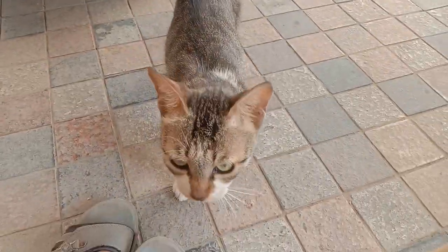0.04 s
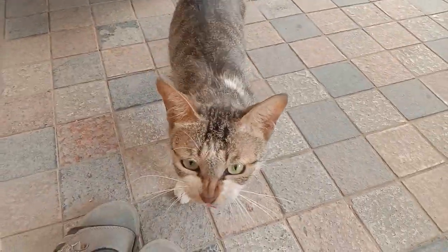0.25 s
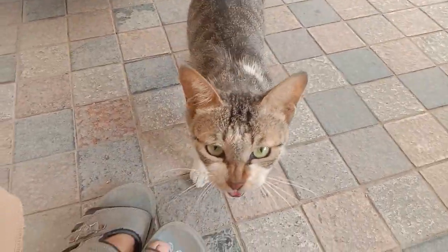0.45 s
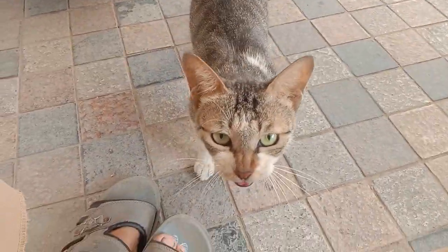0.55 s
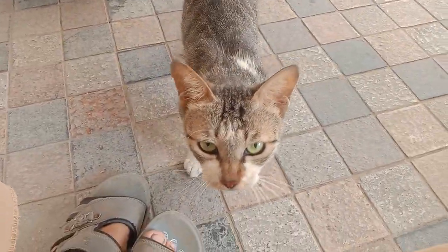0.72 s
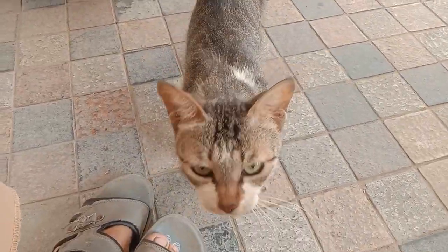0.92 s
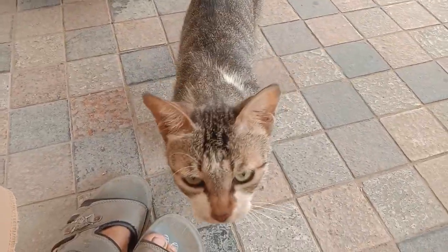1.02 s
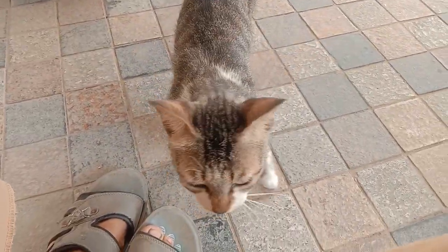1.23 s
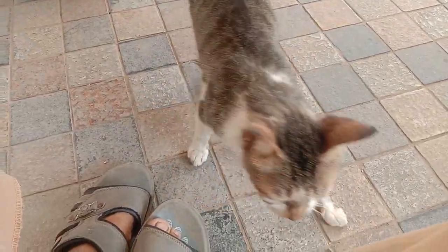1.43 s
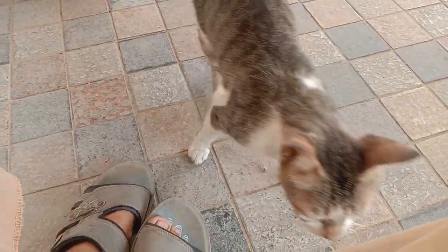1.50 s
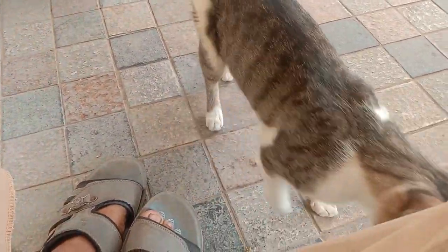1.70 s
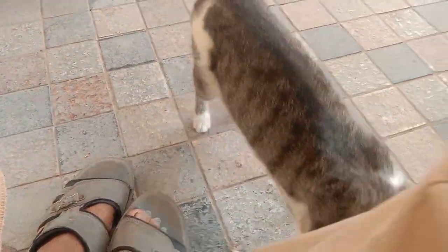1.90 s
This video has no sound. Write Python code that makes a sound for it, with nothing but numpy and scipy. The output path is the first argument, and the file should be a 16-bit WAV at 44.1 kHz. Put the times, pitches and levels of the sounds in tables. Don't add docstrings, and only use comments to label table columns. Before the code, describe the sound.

A cat close to the microphone meows once from about 0.15 to 0.8 s: hoarse and doubled, rising to a clear steady tone, then sinking shut with a short wall echo. A sole scuffs at 0.77-0.95 s. Grit ticks near 1.3-1.4 s as a small hollow object drags, then knocks and rattles at 1.58 s, ringing away. Soft foot thuds, faint traffic hum and leaf hiss lie beneath.

```python
import sys
import numpy as np
from scipy import signal
from scipy.fft import rfft, irfft
from scipy.io import wavfile
from scipy.ndimage import uniform_filter1d

SR = 44100
rng = np.random.default_rng(int(sys.argv[2]) if len(sys.argv) > 2 else 0)


def digitize_waveform(pressure):
    field = np.atleast_2d(pressure).T
    bounded = np.clip(field, -1, 1)
    quanta = np.round(bounded * 32767).astype(np.int16)
    wavfile.write(sys.argv[1], SR, quanta)


def level_to_linear(level):
    exponent = np.asarray(level, float) / 20
    return 10 ** exponent


N = 85995
T = np.arange(N) / SR


def level(x, db):
    return x * level_to_linear(db) / np.sqrt(np.mean(x ** 2))


def colour(x, points, tilt_db=0.):
    p = np.array(points, float)
    size = N + 4117
    hz = np.arange(size // 2 + 1) * SR / size + 1
    db = np.interp(np.log(hz), np.log(p[:, 0]), p[:, 1])
    db = db + tilt_db * np.log2(np.maximum(hz / 5500, 1))
    return irfft(rfft(x, size) * level_to_linear(db), size)[..., :N]


def band(x, hz, width):
    return signal.lfilter(*signal.iirpeak(min(hz, .45 * SR), hz / width, SR), x)


def band_twice(x, hz, width):
    return band(band(x, hz, width), hz, width)


def walk(rate, size=N):
    k = int(SR / rate)
    held = np.repeat(rng.standard_normal(size // k + 1), k)
    return 1.48 * uniform_filter1d(uniform_filter1d(held, k), k)[:size]


def shape(start, attack, hold, fall):
    rise = np.clip((T - start) / attack, 0, 1) ** 2
    return rise * level_to_linear(-20 * np.clip((T - start - attack - hold) / fall, 0, 9))


def decay(start, t60):
    return (T >= start) * level_to_linear(-60 * np.clip((T - start) / t60, 0, 9))


def cat():
    # (time [s], pitch [Hz], level [dB])
    meow = [
        (0.148, 329.6, -59),
        (.2, 361.1, -41),
        (0.252, 415.2, -35.5),
        (0.335, 453.1, -31.5),
        (0.507, 462.5, -25),
        (0.69, 452.8, -28),
        (0.738, 439.5, -31),
        (.78, 403, -29),
        (0.803, 408, -40),
    ]
    # (time [s], resonance [Hz], its level [dB], half-pitch lines [dB], brightness [dB], chest [dB])
    mouth_track = [
        (.18, 2240, -7, -7, -3.5, 0),
        (0.226, 2314, 3, -4, 3.5, 3.5),
        (.285, 2370, 12, -1.5, 8, 1),
        (0.339, 2270, -11, -16, 8, -0.5),
        (0.369, 2004, 10, -23, 6, -2.5),
        (0.484, 1918, 14, -58, 1.5, -6.5),
        (0.571, 1600, -7, -37.5, 0.5, -20.5),
        (0.701, 1450, -6, -49, 6, 2.5),
        (0.791, 1500, -40.5, -20, 1, 7),
    ]
    # (multiple of the held pitch, level [dB])
    throat = [(1, -10.5), (2, 2.5), (3, -2), (4, 0.5), (5, -32), (6, -31), (7, -15.5), (8, -9), (9, -28),
              (10, -28), (11, -27), (12, -27), (13, -37), (14, -44), (15, -24.5), (16, -33.5)]
    # (time [s], roughness at 3.47 kHz [0-1])
    hoarse = [
        (.17, .7),
        (.215, .5),
        (.29, .4),
        (.345, .8),
        (.37, .25),
        (.45, .12),
        (.5, .05),
        (.75, .06),
        (.8, .4),
    ]
    # (time [s], added roughness [0-1])
    catches = [(.345, .3), (.395, .15), (.44, .22), (.525, .12), (.573, .13), (.613, .17), (.667, .16),
               (.706, .2)]
    # (time [s], upper throat resonance [Hz], its level [dB], nose resonance [Hz], its level [dB])
    rasp_track = [
        (.172, 3480, -33, 5810, -31),
        (.19, 3520, 5.5, 6050, -13.5),
        (.235, 3900, -5.5, 6100, -27.5),
        (.29, 4200, -19.5, 6500, -27.5),
        (.35, 4150, -6, 7000, -34.5),
        (.44, 4100, -15, 7150, -18),
        (.55, 4100, -20.5, 6330, -33.5),
        (.63, 4100, -17.5, 6170, -27),
        (.72, 4000, -16.5, 5960, -25.5),
    ]
    held_hz, bright_hz, rough_above_hz, rough_hz = 462, 2870, 3470, 380
    mouth_width_hz, rasp_width_hz, nose_width_hz = 83.5, 260, 187
    start_s, stop_s, fade_s = 0.15, .805, 0.0097
    span = slice(6600, 36600)
    t = T[span]

    def soft(track):
        return uniform_filter1d(track, size=700)

    def drift(rate):
        return walk(rate, size=len(t))

    def tracks(table):
        columns = np.array(table).T
        return [soft(np.interp(t, columns[0], v)) for v in columns[1:]]

    def peak(f, centre, width):
        return 1 / np.sqrt(1 + ((f - centre) / width) ** 4)

    meow_s, meow_hz, meow_db = np.array(meow).T
    throat_multiple, throat_db = np.array(throat).T
    hz = soft(np.interp(t, meow_s, meow_hz))
    mouth_hz, mouth_db, half_db, bright_db, chest_db = tracks(mouth_track)
    rasp_hz, rasp_db, nose_hz, nose_db = tracks(rasp_track)
    mouth, halves, rasp, nose = level_to_linear(mouth_db), level_to_linear(half_db), level_to_linear(rasp_db), level_to_linear(nose_db)

    puffs = level_to_linear(-26 + 4 * np.clip(drift(70), -2, 2))
    rough = np.interp(t, *np.array(hoarse).T)
    rough = rough + sum(more * np.exp(-((t - s) / .007) ** 2) for s, more in catches)
    wobble = 0.0033 * drift(40.6) + 0.0033 * rough * drift(220)
    phase = 2 * np.pi * np.cumsum(hz * (1 + wobble)) / SR
    closing_db = -150 * np.clip(t - meow_s[6], 0, 1)
    top_db = -55 * np.clip(t - .46, 0, 1)

    out = np.zeros(N)
    for k in np.arange(1, 35.5, .5):
        f, half = k * hz, k % 1 > 0
        db = np.interp(f / held_hz, throat_multiple, throat_db)
        db = db + bright_db / (1 + (bright_hz / f) ** 6) - .7 * max(k - 17, 0)
        db = db + chest_db * (k == 1) + closing_db * (2 < k < 7 or k > 10) + top_db * (k > 18)
        gain = level_to_linear(db) + mouth * peak(f, mouth_hz, mouth_width_hz)
        if 6 < k < 20:
            gain = gain + rasp * peak(f, rasp_hz, rasp_width_hz) + nose * peak(f, nose_hz, nose_width_hz)
        line = halves if half else 1
        reach = np.clip(.24 * halves * 2 + (f / rough_above_hz) ** 1.9, 0, 9)
        smear = np.clip(rough * reach, 0, 1)
        noise = line * smear + puffs * (0.2 + f / rough_above_hz)
        turn = k * phase + np.pi / 2 * k ** 2 + 2 * np.pi * rng.random() * (half or k > 5)
        line = line * np.sqrt(1 - smear ** 2) * level_to_linear(.35 * np.clip(k - 4, 1, 11) * drift(12))
        in_phase = (line + noise * drift(rough_hz)) * np.sin(turn)
        out[span] += gain * (in_phase + noise * drift(rough_hz) * np.cos(turn))
    gate = np.clip(np.minimum(T - start_s, stop_s - T) / fade_s, 0, 1)
    return out * gate * level_to_linear(soft(np.interp(T, meow_s, meow_db)) - 2)


def knock():
    # (time [s], level [dB])
    blows = [(1.582, -4.5), (1.5854, 0.5), (1.592, 3.5), (1.605, 0.5), (1.622, -4.5), (1.639, -5),
             (1.65, -8.5), (1.665, -12.5), (1.674, -13.5), (1.699, -13.5), (1.719, -11)]
    # (frequency [Hz], level [dB], t60 [s])
    body = [(186, -13.5, 0.65), (404, -6, 0.4), (807, -7.5, 0.94), (1040, -16, .3), (600, -10.5, 0.13),
            (1274, 1, 0.82), (1500, -20, .5), (1856, -5.5, .7), (3016, -0.5, 0.39), (3270, -14, 0.2),
            (4460, -31, 0.35), (5000, -28, 0.17)]
    # (frequency [Hz], level [dB])
    clatter_colour = [(70, -19), (180, -3.5), (450, -9), (862, -9.5), (1250, 2), (1600, -23), (5460, -19.5),
                      (16000, -24)]
    crack_s, clatter_t60_s, tail_t60_s = 0.0011, 0.12, 0.94
    start = blows[1][0]
    crack = rng.standard_normal(N) * sum(level_to_linear(db) * decay(s, crack_s * 3) for s, db in blows)
    rings = 0
    for hz, db, t60 in body:
        ring_s = .2 * t60
        sustained = level(band(rng.standard_normal(N), hz, 9 / ring_s), 0) * 0.13 * decay(start, t60)
        struck = band(crack, hz, 4.9 / ring_s) * SR * ring_s / 300
        rings = rings + level_to_linear(db) * (sustained + struck)
    hiss = rng.standard_normal((2, N))
    contacts = sum(level_to_linear(db) * uniform_filter1d(decay(s, clatter_t60_s), size=60) for s, db in blows)
    clatter = level(colour(hiss[0], clatter_colour), -28.5) * contacts
    tail = level(colour(hiss[1], clatter_colour, tilt_db=-10.5), -34)
    tail = tail * decay(start, tail_t60_s) * level_to_linear(2.5 * walk(29.54))
    return level_to_linear(-20) * rings + clatter + tail


def drag():
    # (frequency [Hz], width [Hz], level [dB])
    modes = [(1036, 23, -12), (1497, 110, -5.5), (1617, 114, -3.5), (1878, 150, 0), (2430, 95, -42),
             (3400, 200, -53), (4294, 69, -11.5), (4930, 730, -20), (6720, 150, -21.5)]
    slips_per_s = 6000
    slips = (rng.random(N) < slips_per_s / SR) * rng.standard_normal(N) * level_to_linear(1.5 * walk(70))
    rung = sum(level_to_linear(db) * level(band_twice(slips, hz, 1.1 * w), 10 * np.log10(w)) for hz, w, db in modes)
    return level(rung, -41.5) * shape(1.372, attack=.02, hold=0.28, fall=0.29)


def scuff():
    # (frequency [Hz], level [dB])
    sole_colour = [(500, -21), (620, 7.5), (974, -12.5), (1260, 2), (2130, -5.5), (3800, 4.5), (5630, 0),
                   (9500, -14.5)]
    start_s, hold_s, grit_hz = 0.7684, 0.14, 14900
    sag = level_to_linear(-10.5 * np.clip((T - start_s) / hold_s, 0, 1) + 0.5 * walk(40))
    grit = level(band_twice(rng.standard_normal(N), grit_hz, 2500), -54.5)
    sole = level(colour(rng.standard_normal(N), sole_colour), -40) * sag
    return (sole + grit) * shape(start_s, 0.016, hold_s, fall=0.066)


def ticks():
    # (time [s], level [dB], length [s], centre [Hz])
    clicks = [(.345, -19, 0.0042, 3970), (.777, -46, .004, 6500), (1.322, -34, 0.00066, 11000),
              (1.35, -41, .0015, 5000), (1.351, -32, 0.0012, 11000), (1.38, -39, 0.0044, 3100),
              (1.385, -33, 0.0087, 3900), (1.386, -33, 0.011, 4930), (1.389, -34, 0.0082, 7400),
              (1.39, -35, 0.0093, 10100), (1.426, -40, .002, 9800), (1.437, -41, .002, 9500),
              (1.573, -24, .012, 1950)]
    hiss = rng.standard_normal(N)
    return sum(level_to_linear(db) * band_twice(hiss * decay(s, 4 * length), hz, .4 * hz) for s, db, length, hz in clicks)


def steps():
    # (time [s], level [dB], length [s])
    thuds = [
        (0.118, -50.5, 0.034),
        (0.89, -52, 0.05),
        (1.303, -47.5, 0.075),
        (1.369, -52.5, 0.065),
        (1.631, -42.5, 0.067),
    ]
    push = sum(level_to_linear(db) * shape(s, 0.012, length / 3, length) for s, db, length in thuds)
    return 12 * band_twice(rng.standard_normal(N) * push, 128, 128)


def hums():
    # (time [s], level [dB], length [s])
    swells = [(0.02, -52.5, 0.048), (0.061, -50, 0.087), (0.106, -51, 0.026), (0.628, -52.5, 0.098),
              (0.978, -52, .16), (1.484, -51, 0.14), (1.797, -47, 0.035)]
    hum_hz, width_hz = 325, 66
    push = sum(level_to_linear(db) * shape(s, 0.016, length / 2, length) for s, db, length in swells)
    return 14 * band(band(rng.standard_normal(N) * push, hum_hz, width_hz), hum_hz, 2 * width_hz)


def yard():
    # (frequency [Hz], density [dB per Hz])
    traffic_colour = [(40, -14), (95, -7), (250, -11.5), (311, -7), (400, -13.5), (700, -24), (2500, -28),
                      (16000, -57)]
    traffic = colour(rng.standard_normal(N), traffic_colour)
    swell = walk(2.53)
    centres = 40 * 2 ** np.arange(0, 9, .5)
    bands = sum(level_to_linear(1.8 * swell + 1.92 * walk(8.78)) * band(traffic, hz, hz / 3.2) for hz in centres)
    return level(bands, -51.5)


def leaves():
    # (frequency [Hz], density [dB per Hz])
    leaf_colour = [(1850, 2), (2550, -28.5), (3400, 6.5), (4200, -4.5), (5500, 0), (7000, -26.5),
                   (12000, -1.5), (16000, -7.5)]
    # (time [s], level [dB])
    breeze = [
        (0, -66),
        (.2, -59.5),
        (.93, -53),
        (1.02, -63.5),
        (1.2, -60),
        (1.33, -62.5),
        (1.7, -56.5),
        (1.95, -60.5),
    ]
    gusts = level_to_linear(np.interp(T, *np.array(breeze).T) + 1.1 * walk(14))
    return level(colour(rng.standard_normal(N), leaf_colour), 0) * gusts


def scene():
    voice = cat()
    walls = (rng.standard_normal(N) * decay(0.016, .3))[:SR // 2]
    wet = signal.fftconvolve(voice, walls / np.sqrt(np.sum(walls ** 2)))[:N]
    far = level_to_linear(-19) * wet + yard() + scuff()
    recess = level_to_linear(13) * band(far, 1263, 34) * level_to_linear(2.5 * walk(8.1))
    return (voice + far + knock() + recess + leaves() + drag() + ticks() + steps() + hums())[None]


def band_limit(x):
    return signal.sosfilt(signal.butter(12, 16250, fs=SR, output="sos"), x)


def record(dry):
    # (frequency [Hz], level [dB])
    port = [(25, -30.5), (90, 1.5), (6000, 0), (7200, -11), (8000, -18), (13800, -24), (15200, -12),
            (15600, -17.5)]
    top = signal.ellip(8, .2, 70, 15700, fs=SR, output="sos")
    mix = signal.sosfilt(top, colour(dry, port))
    return band_limit(mix)


dry = scene()
out = record(dry)
digitize_waveform(out)
```